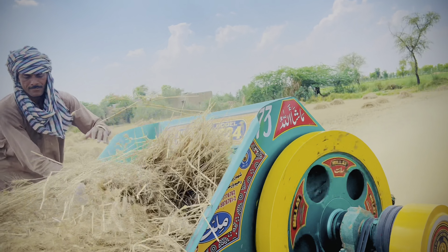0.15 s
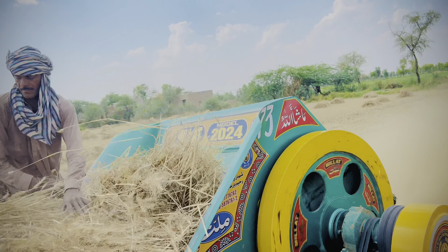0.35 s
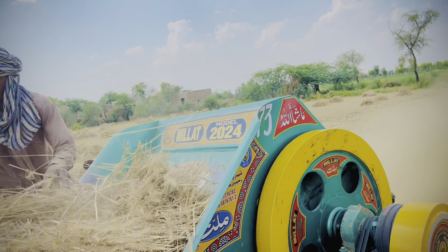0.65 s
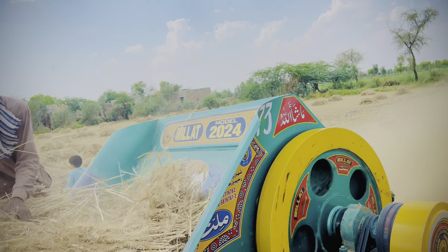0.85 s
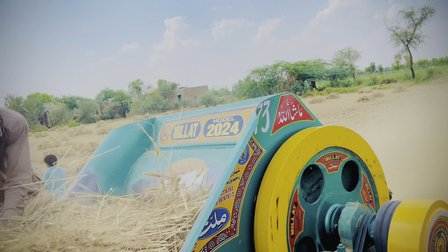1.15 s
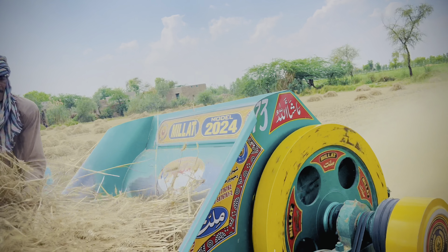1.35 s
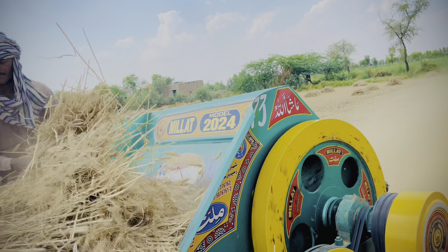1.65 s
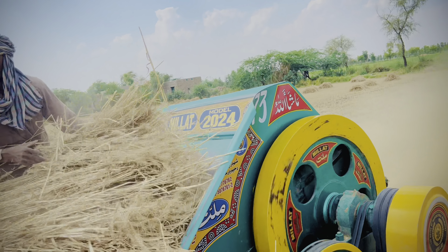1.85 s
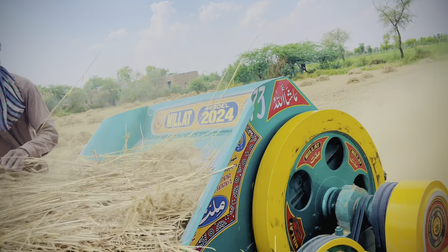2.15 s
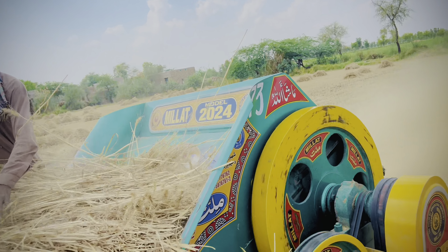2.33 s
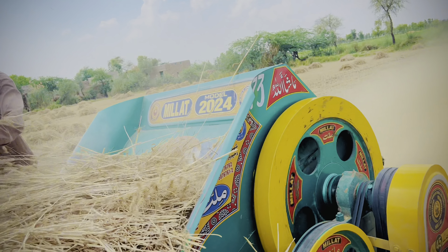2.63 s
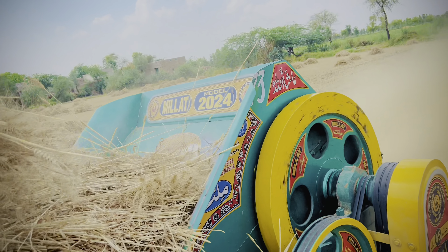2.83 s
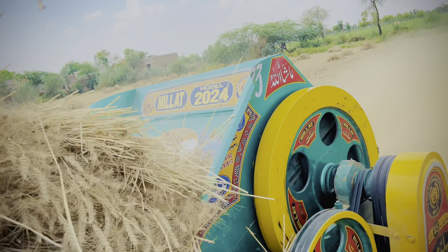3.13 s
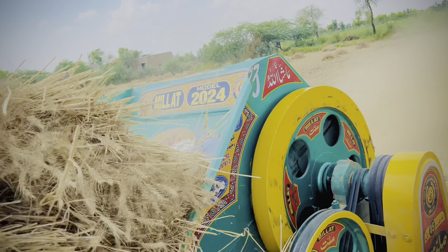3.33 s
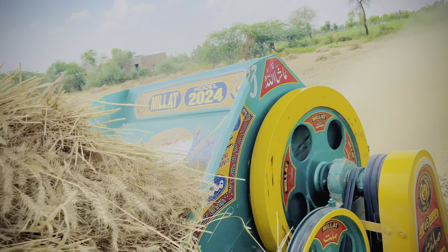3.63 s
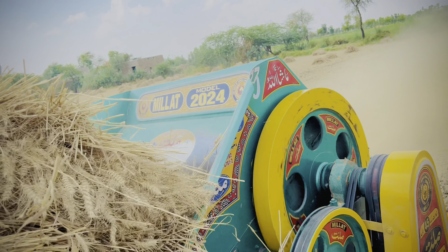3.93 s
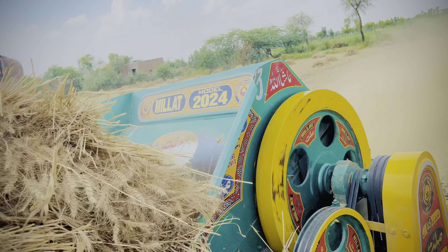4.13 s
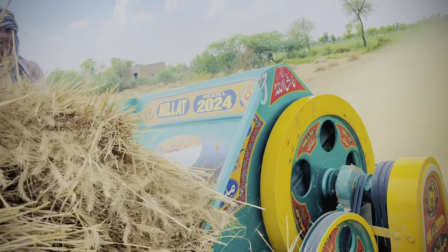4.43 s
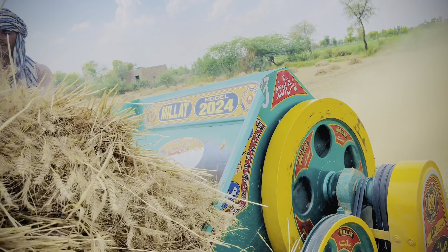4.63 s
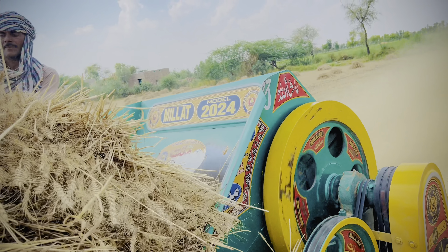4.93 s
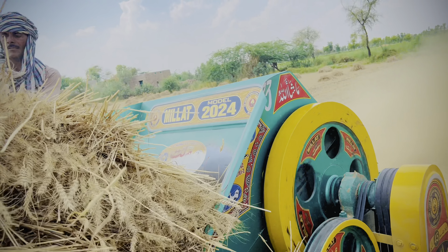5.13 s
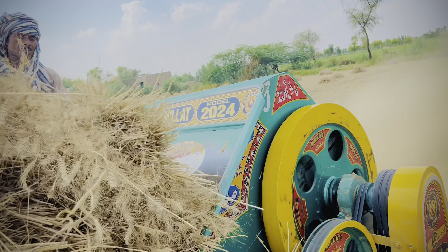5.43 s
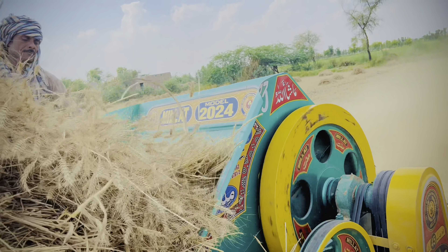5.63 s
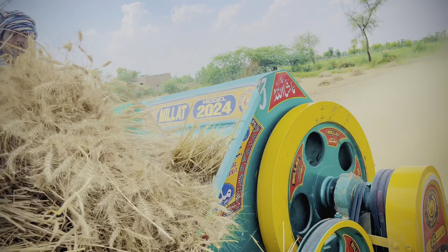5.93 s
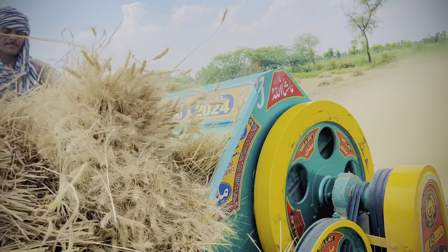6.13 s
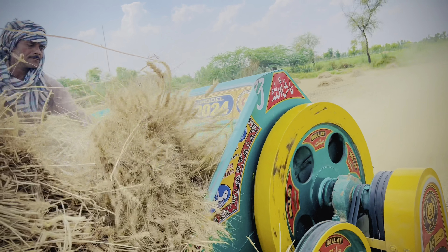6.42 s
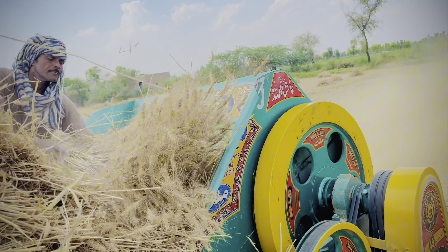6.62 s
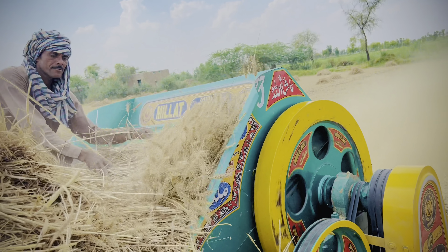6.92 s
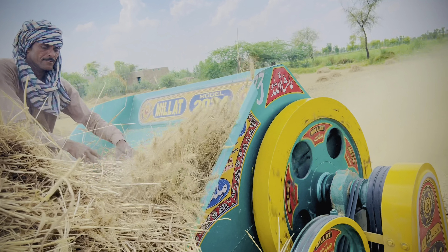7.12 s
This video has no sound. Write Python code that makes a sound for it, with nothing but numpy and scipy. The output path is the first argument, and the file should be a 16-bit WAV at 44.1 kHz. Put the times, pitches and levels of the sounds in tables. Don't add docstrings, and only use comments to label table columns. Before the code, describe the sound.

Close, rough machine hum with roaring air and crackling straw sinks in pitch under load, knocked by hollow metallic thumps, then climbs again.

```python
import sys
import numpy as np
from scipy import signal
from scipy.fft import rfft, irfft, next_fast_len
from scipy.io import wavfile
from scipy.ndimage import uniform_filter1d

SR = 44100
rng = np.random.default_rng(int(sys.argv[2]) if len(sys.argv) > 2 else 0)


def volts_from_decibels(level):
    exponent = np.asarray(level, float) / 20
    return 10 ** exponent


def int16_out(signal):
    q = np.round(np.clip(np.atleast_2d(signal).T, -1, 1) * 32767)
    wavfile.write(sys.argv[1], SR, q.astype(np.int16))


N = 320607
TIME = np.arange(N) / SR
FREQ = np.fft.rfftfreq(next_fast_len(N), 1 / SR)
USUAL_HZ = 48
USUAL_FEED = -37.5
USUAL_STRAIN = -45


def columns(table, at, warp=lambda v: v):
    first, *rest = np.transpose(table)
    return [np.interp(warp(at), warp(first), column) for column in rest]


def filtered(x, response):
    size = next_fast_len(N)
    return irfft(rfft(x, size) * response, size)[..., :N]


def unit(x):
    return x / np.sqrt(np.mean(x ** 2))


def coloured(x, spectrum):
    return unit(filtered(x, volts_from_decibels(columns(spectrum, FREQ + 1, np.log)[0])))


def resonance(hz, width):
    return 1j * FREQ * width / (hz ** 2 - FREQ ** 2 + 1j * FREQ * width)


def walk(rate):
    points = N // 500
    return 1.2 * np.interp(TIME * rate, np.arange(points), rng.standard_normal(points))


def bump(s, length):
    return np.exp(-((TIME - s) / length) ** 2)


def hiss():
    return rng.standard_normal((2, N))


def throb(turns, depth, uneven, lag, scatter_db, sharp):
    passes = turns + lag
    blade = np.floor(passes).astype(int)
    load = np.clip(rng.standard_normal(blade[-1] + 1), -2, 2)[blade]
    strength = volts_from_decibels(np.array(uneven)[blade % len(uneven)] + scatter_db * load)
    return 1 + depth * strength * np.sin(np.pi * (passes % 1)) ** sharp


# level/dB at the usual rate, slope/dB per Hz of blade rate
PARTIALS = [(-29, 1.11), (-24, 1.27), (-33.5, -0.16), (-35, -0.85), (-42.5, 1.66), (-40.5, -0.73),
            (-51, 0.62), (-50.5, 1.14), (-53, 0.12), (-52, 0.74)]
BEATS = [(.83, -.13), (.73, .48), (.26, .27), (.32, .74), (.49, .57), (.19, .66), (.18, .26), (.1, .67),
         (.21, .7), (.09, .31)]
# f/Hz, width/Hz, level/dB
LIFTS = [(110.4, 23.4, -7.2), (167.1, 12.1, 8.2), (208.9, 6.8, 13.9), (282.8, 15.2, 5.1), (342, 36.7, 14),
         (419.7, 64.4, 14), (496.4, 31, 14)]
# t/s, order, length/s, level/dB
SURGES = [(.65, 1, .4, -4.5), (.99, 4, .11, 7.5), (1.49, 5, .22, 11.6), (1.51, 3, .15, -10),
          (1.56, 4, .2, 6.4), (1.61, 2, .25, 7.6), (1.9, 1, .13, -5.5), (2.02, 1, .29, 5.9),
          (2.22, 2, .16, -6.2), (2.27, 3, .09, -18), (2.91, 3, .13, -18), (2.99, 2, .19, 4.9),
          (3.21, 2, .09, -8), (3.22, 5, .19, 11.6), (3.72, 4, .33, -13), (3.78, 2, .18, 5.5),
          (3.81, 3, .1, -18), (4.19, 3, .06, -9), (4.23, 2, .07, -5.5), (4.44, 4, .11, 5.7),
          (4.66, 2, .15, 5.6), (5.95, 2, .12, -8.8), (6.72, 2, .08, 3.4), (7.03, 3, .33, 4.8),
          (.78, 7, .09, -14), (4.17, 6, .1, 3), (4.65, 9, .12, -12), (5.2, 8, .07, -14),
          (.33, 2, .05, -6), (.54, 2, .05, -7), (.58, 4, .07, 6), (.6, 6, .35, 3), (.78, 5, .12, 3),
         (7.1, 5, .2, 4), (1.27, 8, .09, -5), (1.35, 7, .15, 5), (2.85, 4, .15, 4), (3.08, 2, .07, 3),
         (1.9, 10, .3, 5), (2.3, 5, .15, -5), (2.45, 9, .3, 4), (3.0, 8, .6, -5), (3.0, 7, .12, 5),
         (3.39, 2, .07, 8), (4.6, 6, .08, -9), (4.9, 8, .22, 8), (4.95, 9, .15, 5), (5.26, 2, .08, 4),
         (5.4, 5, .2, -8), (5.6, 8, .28, 7), (6.0, 7, .15, 7), (6.0, 10, .1, -10), (6.3, 8, .25, -4),
         (6.6, 10, .12, -10), (7.15, 6, .12, -9)]


def hum(turns, hz, slip):
    out = 0
    for k, (db, slope), (share, lag) in zip(range(1, 11), PARTIALS, BEATS):
        flutter = 1.5 * np.sqrt(k - 1) * np.tanh(walk(9))
        surge = sum(g * bump(s, length) for s, order, length, g in SURGES if order == k)
        lift = sum(g / (1 + (2 * (k * hz - f) / width) ** 2) for f, width, g in LIFTS)
        level = volts_from_decibels(db + slope * (hz - USUAL_HZ) + flutter + surge + lift)
        beat = np.abs(1 + share * np.exp(2j * np.pi * (slip + lag)))
        phase = k * 2 * np.pi * turns - np.pi / 2
        phase = phase + 0.55 * np.sqrt(k) * walk(1.205) + 0.036 * k * walk(12)
        skew = 0.081 * min(k, 6) ** 0.86 * np.tanh(walk(1.46))
        out = out + np.sqrt(2) * level * beat * np.sin(phase + np.array([0 * skew, skew]))
    return out


# f/Hz, level/dB per Hz
ROAR = [(30, -26), (45, -3), (70, -3.5), (130, -3), (250, -5), (400, -4.5), (540, -5.5), (640, -6.5),
        (1000, -11.5), (1200, -15), (1600, -15.5), (1900, -18), (3000, -35.5)]
# f/Hz, width/Hz, level/dB
CASING = [(1242, 55, -41.5), (1578, 78, -46), (1477, 86, -46), (662, 35, -40.5), (829, 46, -42.5)]
# f/Hz, width/Hz, level/dB
PANEL = [(495, 21, -1.1), (524, 15, 0.1)]
# t/s, level/dB
SHAKES = [(.72, -24), (.95, -30), (1.33, -30), (1.72, -31), (2.0, -38), (2.22, -27), (2.75, -30),
          (2.93, -29), (3.79, -32), (4.0, -42), (4.25, -24.5), (4.5, -23.5), (4.82, -26.5), (6.1, -41),
          (6.88, -35), (7.25, -33)]


def roar(turns, db):
    swell = throb(turns, 0.32, [-6, -1.5, -0.5, -1.5], 0.35, 4.7, 1.8)
    air = coloured(hiss() * swell, ROAR) * volts_from_decibels(db + 8.0)
    ring = 0
    for hz, width, g in CASING:
        ring = ring + volts_from_decibels(g + 2.4 * np.tanh(walk(5))) * unit(filtered(hiss(), resonance(hz, width)))
    panel = unit(filtered(hiss(), sum(volts_from_decibels(g) * resonance(hz, width) for hz, width, g in PANEL)))
    rattle = volts_from_decibels(-32 + 2.5 * walk(8))
    shake = rattle + sum(volts_from_decibels(g) * bump(s, 0.071) for s, g in SHAKES)
    return air + ring * volts_from_decibels(db + 33.5) + panel * shake * volts_from_decibels(-5)


# f/Hz, level/dB per Hz
STRAW = [(1200, -18), (2000, -0.5), (3600, 0.5), (5000, -1.5), (5350, -2.5), (5900, 0), (7200, -5.5),
         (7600, -10), (9000, -7), (9800, -12), (11000, -6.5), (11800, -18)]
# f/Hz, level/dB per Hz
DUST = [(10500, -30), (11200, -6), (12400, 1.5), (13500, -1), (15700, -4), (17000, -9)]


def straw(turns, db, dust_db):
    crack_db = 3 * np.minimum(rng.exponential(size=N // 128 + 1), 4)
    cracks = uniform_filter1d(volts_from_decibels(crack_db.repeat(128)[:N]), size=96)
    swell = throb(turns, 0.39, [-3.5, -2.5, -2, -1], 0.19, 4.9, 2.4)
    grain = coloured(hiss() * swell * (1 + 0.17 * cracks), STRAW)
    edges = [0, 2300, 3000, 4100, 5400, 7400, SR]  # Hz, coarse to fine stalks
    patches = 0
    for low, high in zip(edges, edges[1:]):
        band = filtered(grain, (FREQ >= low) & (FREQ < high))
        patches = patches + band * volts_from_decibels(1.05 * np.tanh(walk(8)))
    dust = hiss() * volts_from_decibels(0.7 * walk(18))
    return patches * volts_from_decibels(db + 6.5) + coloured(dust, DUST) * volts_from_decibels(dust_db + 4)


# f/Hz, width/Hz, level/dB
BEARING = [(8250, 300, 4), (8700, 2400, -2), (7950, 340, -10), (8240, 80, -3)]


def bearing(turns, db):
    shake = hiss() * throb(turns, 0.93, [-0.5, -7, 4.0, 0.5], 0.72, 3.9, 5.5)
    ring = np.sqrt(sum(np.abs(volts_from_decibels(g) * resonance(hz, width) ** 2) ** 2 for hz, width, g in BEARING))
    sing_db = -59 - (db - USUAL_STRAIN)
    sing = unit(filtered(shake, resonance(8235, 60) ** 2)) * volts_from_decibels(sing_db)
    return unit(filtered(shake, ring)) * volts_from_decibels(db + 4.5) + sing


# t/s, peak level/dB, ring f/Hz
THUMPS = [(0.014, -17.5, 495), (0.175, -26, 494), (0.686, -4.5, 520.6), (0.803, -21, 524),
          (1.474, -12.5, 512), (1.552, -22.5, 500), (1.782, -13.5, 488.8), (1.849, -19, 493),
          (2.025, -28, 525), (3.444, -26, 475), (3.777, -17.5, 515), (3.936, -23, 495), (4.491, -18, 504),
          (5.207, -32, 501)]


def thumps():
    out = np.zeros(N + SR)
    age = np.arange(SR // 5) / SR
    push = np.exp(-((age - .014) / 0.0096) ** 2)
    bounce = 0.28 * np.exp(-((age - .052) / 0.033) ** 2)
    for s, db, hz in THUMPS:
        start = int((s - .008) * SR)
        ring = np.sin(2 * np.pi * hz * age)
        out[start:start + len(age)] += volts_from_decibels(db - 5.5) * (push + bounce) * ring
    return out[:N]


# t/s, length/s, level/dB
WHINES = [(1.15, .17, -46), (1.4, .1, -48), (2.0, .22, -48), (4.2, .2, -51), (5.4, .15, -53),
          (6.2, .35, -48)]
# t/s, length/s, top f/Hz, sag at the ends/Hz, level/dB
SQUEAKS = [
    (3.43, .1, 2505, 90, -48),
    (4.17, .05, 2310, 10, -50),
    (5.87, .14, 1592, 0, -46),
]


def squeaks(turns):
    waver = 1 + .002 * walk(25)
    drag = sum(volts_from_decibels(db) * bump(s, length) for s, length, db in WHINES) * volts_from_decibels(3.5 * np.tanh(walk(14)))
    out = drag * np.sin(2 * np.pi * 32 * turns + walk(6))
    for s, length, hz, sag_hz, db in SQUEAKS:
        sag = sag_hz * np.minimum(((TIME - s) / length) ** 2, 4)
        pitch = (hz - sag) * waver
        out = out + volts_from_decibels(db) * bump(s, length) * np.sin(2 * np.pi * np.cumsum(pitch) / SR)
    return np.sqrt(2) * out


# t/s, blade rate f/Hz
DRIVE = [(0, 57.18), (.35, 56.43), (.6, 55.86), (.95, 54.35), (1.28, 52.2), (1.67, 49.78), (2.05, 48.27),
         (2.45, 47.55), (2.85, 47), (3.25, 47.6), (3.55, 47.08), (4, 47.07), (4.5, 45.05), (4.9, 44.58),
         (5.5, 45.32), (6, 46.32), (6.6, 48.2), (7.27, 51.03)]
# t/s, drum pulses behind blower pulses/turns
SLIP = [(0, -.21), (.35, .01), (.6, .08), (.95, .41), (1.28, .64), (1.67, 1.05), (2.05, 1.5), (2.45, 1.65),
        (2.85, 1.85), (3.25, 1.96), (3.55, 2.06), (4, 2.3), (4.5, 2.67), (4.9, 2.8), (5.5, 3.01), (6, 3.25),
        (6.6, 3.16), (7.27, 3.52)]
# t/s, straw feed level/dB, bearing strain level/dB
FEED = [(0, -38, -48), (.8, -36, -49), (.95, -37, -50), (1.35, -34, -46.5), (1.52, -35, -46),
        (1.7, -36.5, -48), (2.5, -37, -48), (2.9, -37.5, -49), (3.1, -38.5, -44), (3.6, -39, -45.5),
        (3.95, -37.5, -44), (4.3, -37, -41.5), (4.7, -39.3, -44.5), (5.62, -39, -46.5), (5.89, -38.5, -42),
        (6.2, -39, -45), (6.9, -39.5, -50), (7.27, -37.5, -46)]
# f/Hz, left minus right level/dB, likeness/0-1, left leads by/rad
PORTS = [(60, 0, 0.48, 0), (300, -1.5, 0.75, 0.33), (530, -1, 0.64, 0.37), (714, 0.5, 0.08, 2.5),
         (990, -0.8, 0.19, 3), (1710, -1.5, 0.72, 3.5), (2620, 2, 0.55, 2), (4550, 12.5, 0.06, 6),
         (6000, 13, 0.46, 8), (7600, 4.5, 0.1, 4.5), (8570, 7.5, 0.76, 5.5), (9550, 0.5, 0.13, 3.5),
         (11200, 1, 0.43, 3.5), (11800, 0, 0.75, 0.44)]


def scene():
    (hz,), (slip,) = columns(DRIVE, TIME), columns(SLIP, TIME)
    turns = np.cumsum(hz) / SR
    straw_db, bearing_db = columns(FEED, TIME)
    extra_feed = straw_db - USUAL_FEED
    roar_db = -32.5 + 0.86 * extra_feed + 0.1172 * (hz - USUAL_HZ)
    dust_db = -38.5 + extra_feed
    noise = roar(turns, roar_db) + straw(turns, straw_db, dust_db) + bearing(turns, bearing_db)
    shared, own = noise
    near, far = hum(turns, hz, slip) + thumps()
    balance_db, like, lead = columns(PORTS, FREQ + 1, np.log)
    like = np.clip(like, 0, 1)
    turn = np.exp(-1j * lead)
    paths = np.array([like * turn, np.sqrt(1 - like ** 2), turn]) * volts_from_decibels(-balance_db)
    left = shared + near
    right = filtered(np.array([shared, own, far]), paths).sum(axis=0)
    return np.array([left, right]) + squeaks(turns)


def starved(x, lost):
    hz, _, cells = signal.stft(x, SR, nperseg=2048, noverlap=1024, window="cosine")
    for low, high, share in lost:
        cells[(hz >= low) & (hz < high)] *= rng.random(cells.shape[1]) >= share
    return signal.istft(cells, SR, nperseg=2048, noverlap=1024, window="cosine")[1][:N]


def roll_off(x):
    return signal.sosfilt(signal.butter(12, 16220, fs=SR, output="sos"), x)


# low f/Hz, high f/Hz, share of blocks lost/0-1
SUM_LOST = [(1720, 1900, .07), (1900, 2070, .07), (2070, 2400, .03), (9400, 9720, .05), (9720, 10150, .85),
            (10150, 10500, .96), (10500, 11020, .985), (11020, 11350, .2), (11350, 11720, .06),
            (15740, 23000, 1)]
# start t/s, end t/s
PATCH_TIMES = [(.25, .65), (.73, .83), (1.69, 1.8), (2.02, 2.1), (2.88, 2.96), (3.17, 3.29), (4.08, 4.22),
               (5.56, 5.63), (5.75, 5.86)]


def record(dry):
    both = starved((dry[0] + dry[1]) / 2, SUM_LOST)
    diff = (dry[0] - dry[1]) / 2
    gate = sum(1. * ((TIME > start) & (TIME < end)) for start, end in PATCH_TIMES)
    patch = uniform_filter1d(gate, size=1024) * filtered(diff, (FREQ > 15150) & (FREQ < 15740))
    diff = filtered(diff, FREQ < 11720) + patch
    return roll_off(np.array([both + diff, both - diff]))


dry = scene()
out = record(dry)
int16_out(out)
```